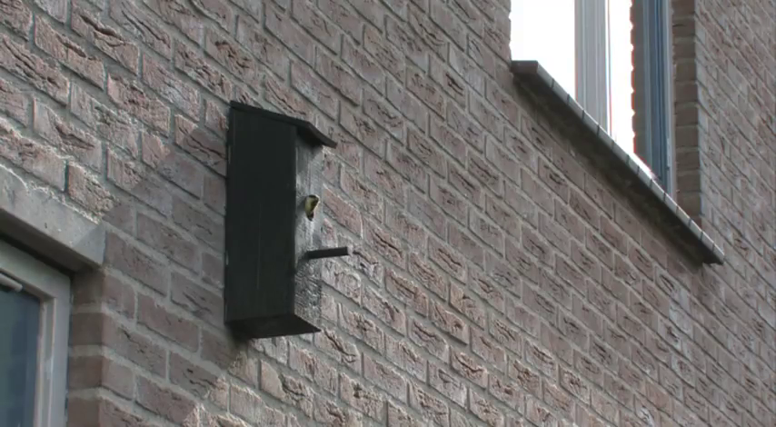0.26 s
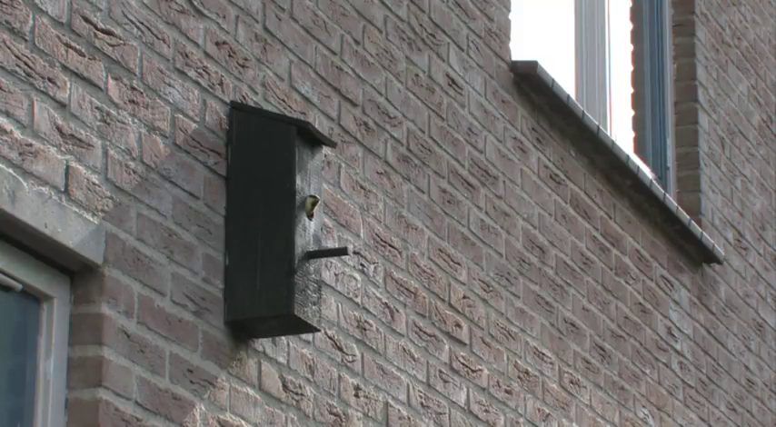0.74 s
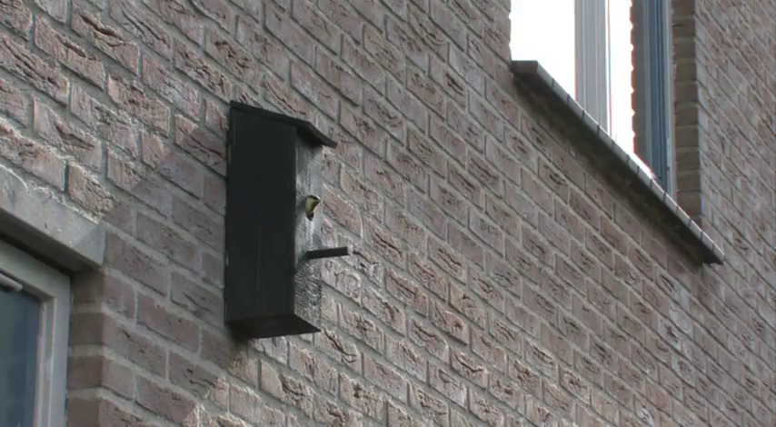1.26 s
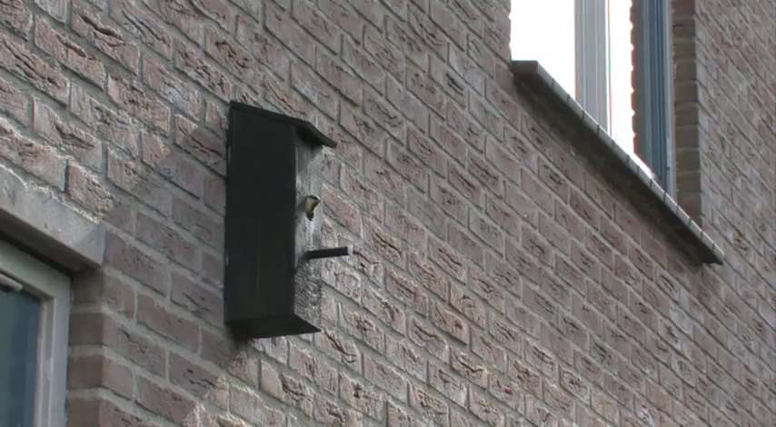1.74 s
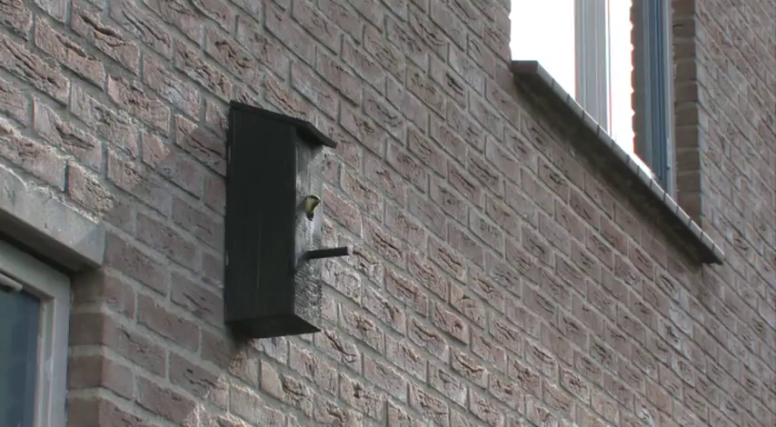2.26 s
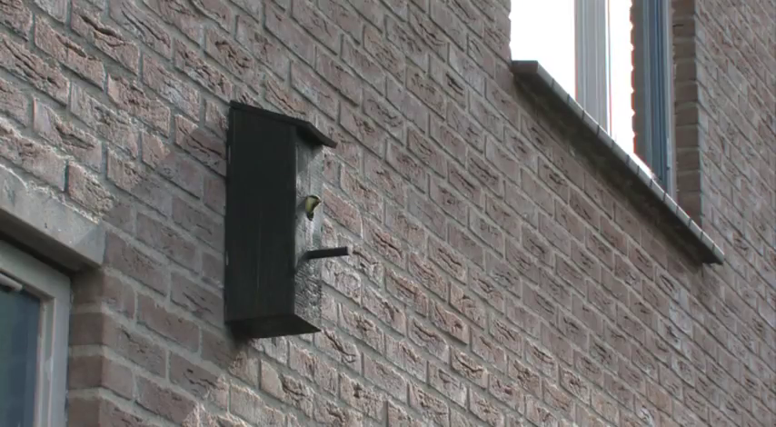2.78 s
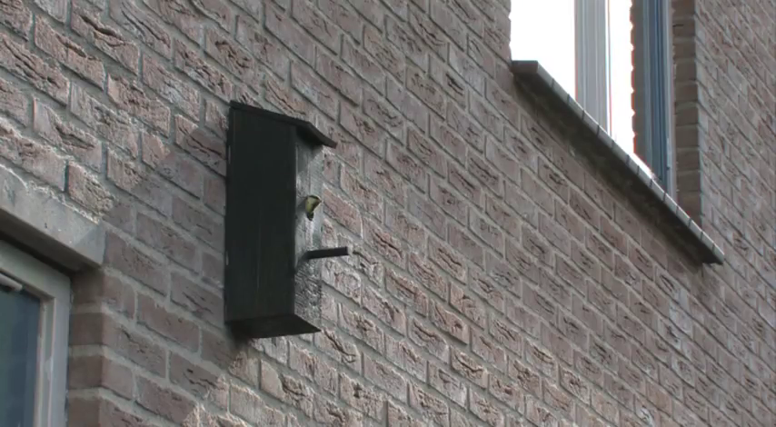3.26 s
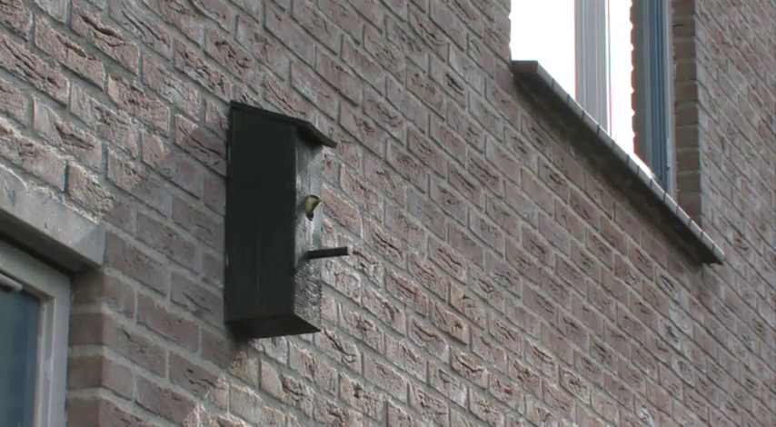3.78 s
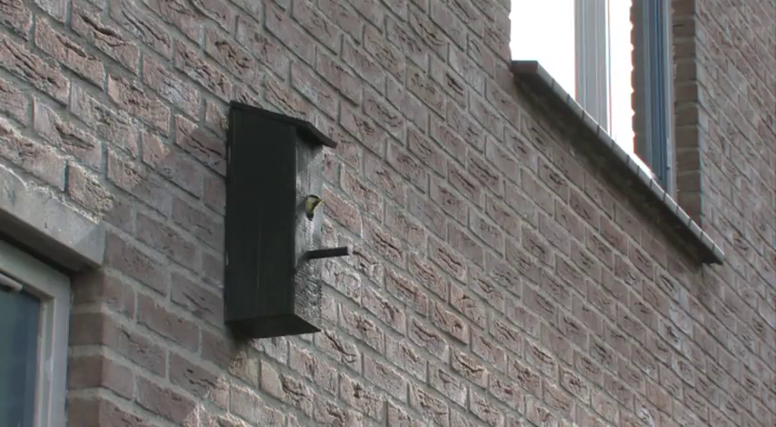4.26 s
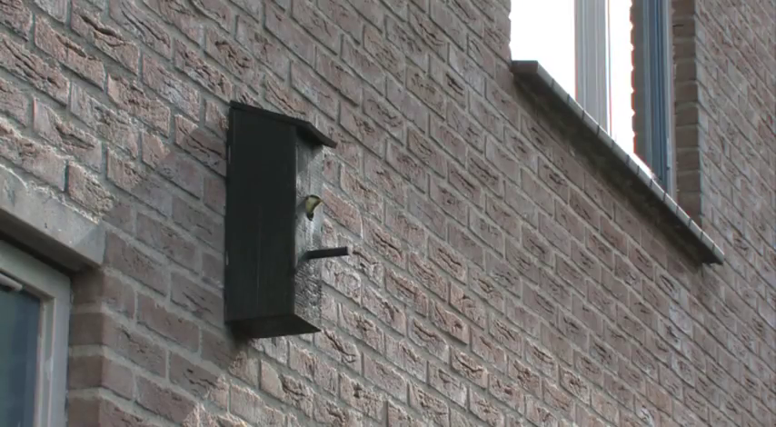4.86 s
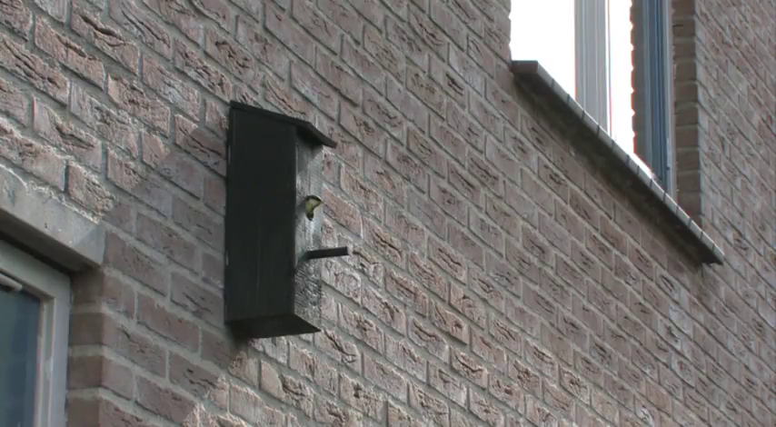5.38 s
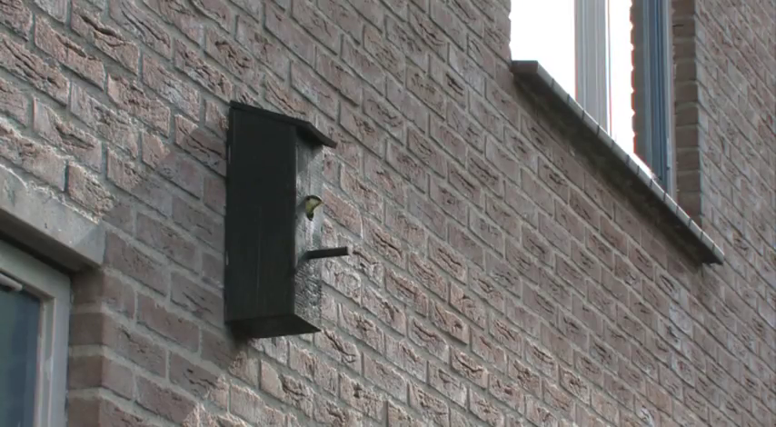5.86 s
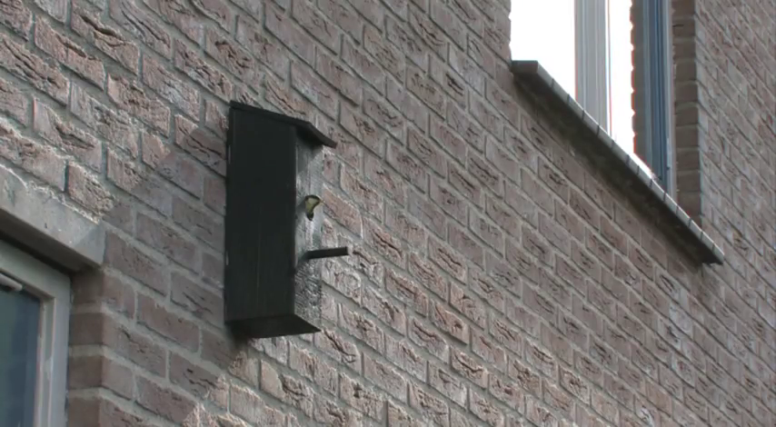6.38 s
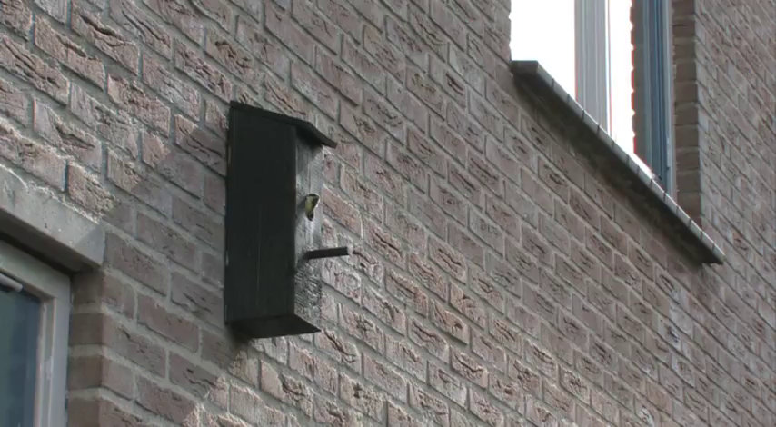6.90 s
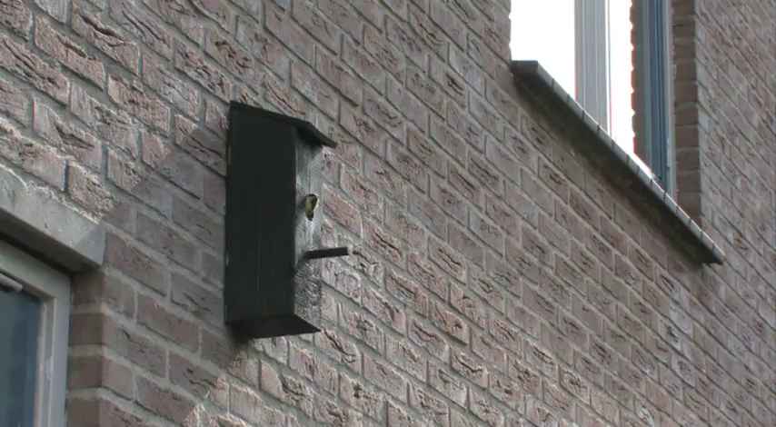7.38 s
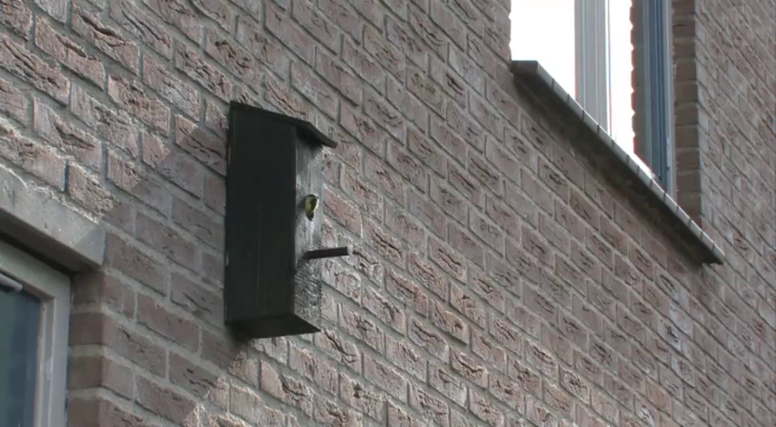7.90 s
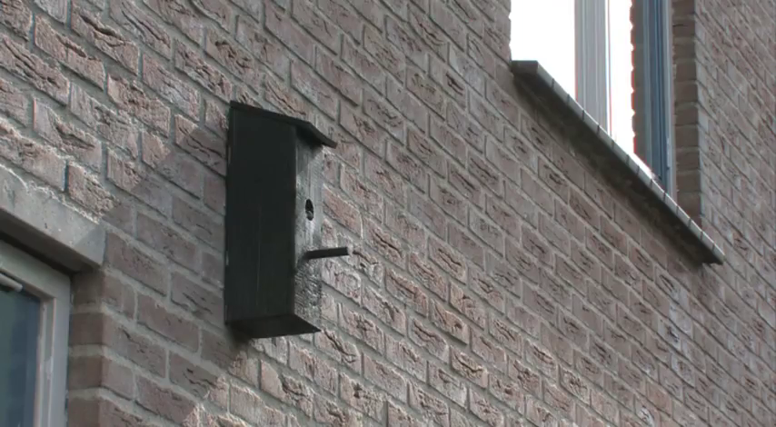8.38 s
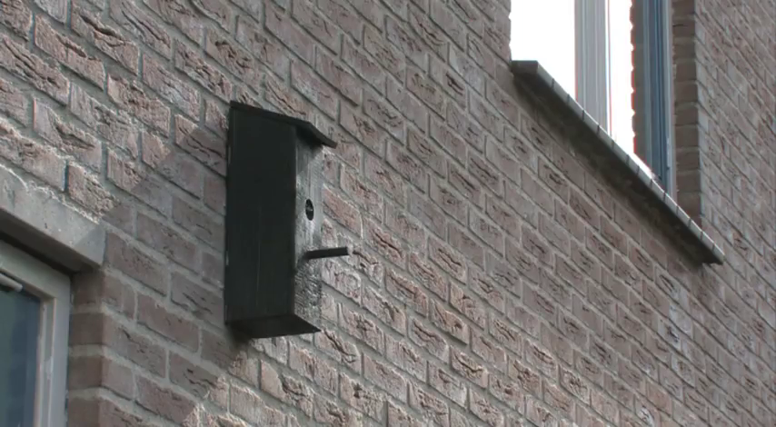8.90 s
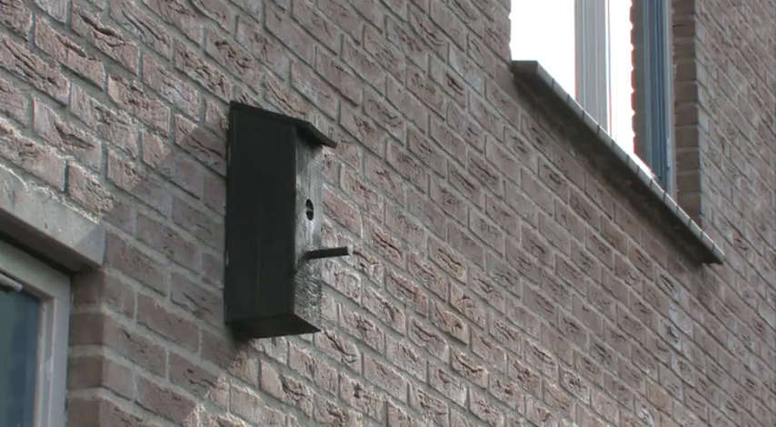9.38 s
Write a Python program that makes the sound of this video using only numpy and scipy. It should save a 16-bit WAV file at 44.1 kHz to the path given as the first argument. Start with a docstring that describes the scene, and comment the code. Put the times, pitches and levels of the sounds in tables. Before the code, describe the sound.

Faint garden birds slur and whistle over low hum and distant traffic; a nearby tit bursts into sharp buzzy chirps, later answering more softly.

```python
"""A yard by a brick house wall: distant traffic, hissing leaves and a camera's hum and whine run throughout.
First, birds in gardens further off give hoarse slurs and thin falling whistles as gliding, nearly pure tones.
Then a small tit at a nest box on the wall gives a loud burst of two-voiced chirps, and soft chirps follow:
both sides of its syrinx sing at once and mix, and the beak picks out partials near 6 kHz. Beyond, whistles
fall, rise and end in upsweeps; the tit closes with soft chirps again and a brighter burst among them."""
import sys
import numpy as np
from scipy import signal
from scipy.fft import rfft, irfft
from scipy.io import wavfile
from scipy.ndimage import uniform_filter1d

SR = 44100
rng = np.random.default_rng(int(sys.argv[2]) if len(sys.argv) > 2 else 0)


def transcribe(signal):
    """Save signal, clipped to [-1, 1], as a 16-bit WAV file at the path in sys.argv[1]."""
    frames = np.atleast_2d(signal).T
    limited = np.clip(frames, -1, 1)
    pcm = np.round(limited * 32767).astype(np.int16)
    wavfile.write(sys.argv[1], SR, pcm)


N = 425565
T = np.arange(N) / SR

# Tit at the nest box: loud burst, soft chirps, bright burst. Each row: start in seconds, length in seconds,
# held pitch of the lower voice in Hz, level in dB before the partial mix, beak and yard.
LOUD_CHIRPS = [(3.394, 0.081, 2670, -18.5), (3.492, 0.065, 2700, -16.5), (3.589, 0.07, 2634, -18),
               (3.725, 0.09, 2640, -18.5)]
SOFT_CHIRPS = [ (4.126, 0.094, 3130, -41), (4.256, 0.097, 3160, -42.5), (4.385, 0.087, 3130, -43),
               (4.520, .095, 3086, -41.5), (4.685, 0.092, 3110, -43), (5.290, .13, 3060, -62),
               (5.470, 0.1, 3080, -59), (5.640, .065, 3040, -58), (7.780, .11, 3140, -56),
               (7.890, 0.096, 3130, -56.5), (8.010, .1, 3140, -55), (8.160, .085, 3140, -57),
               (9.575, 0.11, 3150, -50)]
BRIGHT_CHIRPS = [ (8.527, 0.078, 2874, -33), (8.639, 0.071, 2980, -30.5), (8.746, 0.074, 2980, -30),
                 (8.859, .071, 2920, -30), (8.978, .071, 2940, -29.5), (9.109, 0.076, 2890, -30)]
# Partials of the coupled voices. Each row: multiple of the lower voice, multiple of the upper voice.
PARTIALS = [(1, 0), (0, 1), (2, 0), (1, 1), (0, 2), (3, -1), (-1, 3), (3, 0), (2, 1), (1, 2), (0, 3),
            (4, 0), (2, 2)]
# Base gain of each of those partials, in the same order. Each entry: gain in dB.
PARTIAL_DB = [-1.5, 1.5, -3, -3, -5, -17, -31, -16, -18, -27, -24, -33, -30]
# Shape of a chirp: time of the crest, time of the settled pitch, length of the final fall
RISE_S, SETTLE_S, FALL_S = .017, .032, .012
# The first chirp of a run leaps less, keeps a higher late pitch and has its voices wider apart.
# These are shares of the held pitch, and wear off with a time constant of WARM_UP_S.
FIRST_LEAP, FIRST_SAG, FIRST_SPREAD, WARM_UP_S = .125, 0.0717, .04, 0.083

# Hoarse low slurs of a far bird. Each row: start in seconds, pitch in Hz, level in dB before the swell,
# rasp as a share of the pitch.
FAR_SLURS = [(1.01, 2430, -54, .06), (1.15, 2217, -51.5, .018), (1.40, 1980, -56, 0.038),
             (1.585, 2306, -49, 0.064), (1.72, 2035, -50, .013), (4.75, 2030, -55, .035)]
# Thin falling whistles. Each row: start in seconds, pitch in Hz, level in dB before the swell,
# fall as a share of the pitch.
FAR_FALLS = [ (1.905, 6850, -48, .04), (2.08, 6740, -43.5, .045), (2.263, 6750, -47, 0.035),
             (5.455, 5240, -50.5, 0.08), (5.783, 4135, -42, .03), (6.288, 4316, -48, 0.063),
             (6.702, 4440, -47, .085)]
# Gently rising whistles. Each row: start in seconds, pitch in Hz, level in dB before the swell.
FAR_RISES = [(6.04, 3660, -45.5), (6.074, 4000, -45), (6.505, 3600, -44.5), (6.912, 3620, -43.5)]
# Quick upsweeps that end the song. Each row: start in seconds, pitch in Hz, level in dB before the swell.
FAR_UPSWEEPS = [(7.025, 3850, -47), (7.187, 3860, -43.5), (7.376, 3865, -42.5), (7.574, 3820, -44)]

# Far traffic. Each row: time in seconds, level in dB before the overall trim and flicker.
TRAFFIC_LEVEL = [(0.0, -47), (3.03, -47), (3.79, -48), (7.01, -50), (9.65, -47)]
# Hiss of the leaves. Each row: time in seconds, level in dB before the overall trim and flicker.
LEAF_LEVEL = [(0, -52), (.9, -50.5), (1.6, -53), (2.8, -52.5), (4, -55), (6.5, -58), (8.4, -55),
              (9.65, -55.5)]
# Colour of the outdoor air. Each row: frequency in Hz, relative spectral density in dB.
AIR_COLOUR = [(20, -22), (42, -17), (85, -2.5), (200, -0.5), (450, -1), (1000, -4.5), (1900, -11.5),
              (3500, -14.5), (7000, -18), (9000, -24), (12000, -32.5), (15500, -37)]
# Hum of the camera motor. Each row: mean frequency in Hz, rms level in dB before the throb.
MOTOR_HUM = [(62.9, -62.5), (126.0, -55.5), (150.0, -47)]
# Whine of the camera electronics. Each row: frequency in Hz, rms level in dB.
ELECTRONIC_WHINE = [(11723, -79), (15623, -66)]


def burst(rows, leap, sag, ratio, **voice):
    """One run of the tit's chirps with shared voice and beak settings; the opening one is shaped differently."""
    out = np.zeros(N)
    first_start = rows[0][0]
    for start, length, held_hz, db in rows:
        fresh = np.exp((first_start - start) / WARM_UP_S)
        crest_hz = held_hz * (1 + leap - FIRST_LEAP * fresh)
        late_hz = held_hz * (1 - sag + FIRST_SAG * fresh)
        voice_ratio = ratio + FIRST_SPREAD * fresh
        add(out, start, chirp(length, crest_hz, held_hz, late_hz, voice_ratio, db, **voice))
    return out


def chirp(length, crest_hz, held_hz, late_hz, ratio, db, upper_db, beak_hz, width_hz, opening, coupling_db,
          fundamental_db, rasp_db, hiss_db, onset_db, peak_share, onset_jitter, jitter):
    """Both voices leap to a crest, settle and fall away; their sums and overtones pass the beak resonance."""
    t = np.arange(int(length * SR)) / SR
    knots = np.sort([0, RISE_S / 3, RISE_S, SETTLE_S, length - FALL_S, length])
    knots_hz = [.75 * held_hz, .8 * held_hz, crest_hz, held_hz, late_hz, 0.78 * late_hz]
    pitch = np.interp(t, knots, knots_hz)
    pitch = uniform_filter1d(pitch, size=240, mode="nearest")  # rounds the corners

    # each voice is unsteady on its own, most of all before it has settled
    unrest = np.interp(t, [0, SETTLE_S], [onset_jitter, jitter])
    lower = pitch * (1 + unrest * walk(1476, len(t)))
    upper = pitch * ratio * (1 + unrest * walk(1585, len(t)))

    # the air pressure builds through the chirp; the upper voice starts weak and joins in late
    stages = np.sort([0, RISE_S, length * peak_share, length - 1.5 * FALL_S, length])
    pressure_db = np.interp(t, stages, [onset_db - 12, onset_db, 0, -.5, -17])
    pressure = undb(db + pressure_db)
    joining_db = upper_db + np.interp(t, [RISE_S, SETTLE_S], [-4, 0])

    # the beak opens as the chirp starts, which lifts its resonance
    centre_hz = beak_hz * np.interp(t, [RISE_S, SETTLE_S + FALL_S], [opening, 1])
    tone = 0
    for (m, n), partial_db in zip(PARTIALS, PARTIAL_DB):
        hz = m * lower + n * upper
        # mixed partials follow the coupling of the two sides; the throat muffles the fundamentals
        kind_db = coupling_db * (m * n != 0) + fundamental_db * (m + n == 1)
        gain = undb(partial_db + abs(n) * joining_db + kind_db)
        gain = gain * resonance(hz, centre_hz, width_hz)
        tone = tone + gain * np.sin(cycle(hz) + rng.uniform(0, 2 * np.pi))

    # turbulence in the air stream roughens the tone and hisses through the beak
    rough_tone = tone * (1 + undb(rasp_db) * walk(2500, len(t)))
    breath = undb(hiss_db) * hiss(len(t), centre_hz=6060, width_hz=1500)
    return (rough_tone + breath) * pressure * signal.windows.tukey(len(t), .08)


def far_birds():
    """Birds in gardens further off; all notes of one kind share a length and arch, and most a glide and rasp."""
    out = np.zeros(N)
    for start, hz, db, rasp in FAR_SLURS:
        add(out, start, whistle(hz, db, length=.13, glide=-0.095, arch=-.005, rasp=rasp))
    for start, hz, db, fall in FAR_FALLS:
        add(out, start, whistle(hz, db, length=0.116, glide=-fall, arch=-.008, rasp=0.011))
    for start, hz, db in FAR_RISES:
        add(out, start, whistle(hz, db, length=0.106, glide=0.078, arch=0.02, rasp=0.0061))
    for start, hz, db in FAR_UPSWEEPS:
        add(out, start, whistle(hz, db, length=0.1, glide=.32, arch=.05, rasp=0.013))
    return out


def whistle(hz, db, length, glide, arch, rasp, swell_db=3):
    """A nearly pure note: glide, arch and rasp are shares of its pitch, and it swells towards its end."""
    u = np.linspace(-.5, .5, int(length * SR))
    contour = hz * (1 + glide * u - arch * (2 * u) ** 2)
    pitch = contour * (1 + rasp * walk(710, len(u)))
    swell = undb(db + swell_db * (u - 1.5))  # 6 dB below the given level at the start, 3 dB at the end
    return swell * signal.windows.tukey(len(u), .4) * np.sin(cycle(pitch))


def yard(x, wall_db, tail_db, t60, wall_spread, house_lag=0.069, house_db=-3):
    """Quick reflections off the brickwork, then a thin tail with a soft echo from the houses opposite."""
    t = T[:SR]
    sparse = rng.random(SR) < .01
    wall = rng.standard_normal(SR) * sparse * np.exp(-t / wall_spread) * (t > .002)
    house_echo = 1 + undb(house_db) * np.exp(-((t - house_lag) / 0.019) ** 2)
    tail = rng.standard_normal(SR) * undb(-60 * t / t60) * house_echo * (t > .012)
    # wall and tail levels are relative to the direct sound
    response = undb(wall_db) * wall / np.linalg.norm(wall)
    response += undb(tail_db) * tail / np.linalg.norm(tail)
    return x + signal.fftconvolve(x, response)[:N]


def air(traffic_db=1.0, leaves_db=0.16, split_hz=1700, flicker_db=.5):
    """Noise split in two: far traffic below, a faint hiss of leaves above, each swelling by itself."""
    hz = np.fft.rfftfreq(N, 1 / SR) + 1
    points_hz, points_db = np.transpose(AIR_COLOUR)
    colour = undb(np.interp(np.log(hz), np.log(points_hz), points_db))
    low_share = 1 / (1 + (hz / split_hz) ** 4)  # share of the power
    traffic = irfft(rfft(rng.standard_normal(N)) * colour * np.sqrt(low_share), N)
    leaves = irfft(rfft(rng.standard_normal(N)) * colour * np.sqrt(1 - low_share), N)
    traffic_gain = undb(curve(TRAFFIC_LEVEL) + traffic_db + flicker_db * walk(5.4, N))
    leaves_gain = undb(curve(LEAF_LEVEL) + leaves_db + flicker_db * walk(7, N))
    return traffic / traffic.std() * traffic_gain + leaves / leaves.std() * leaves_gain


def camera(waver=.0015, throb_db=1.13, hiss_db=-74):
    """The motor hums with a slight waver and throb; the electronics add a thin steady whine and an even hiss."""
    hum, whine = 0, 0
    for hz, db in MOTOR_HUM:
        gain = undb(db + throb_db * walk(5, N))
        hum = hum + gain * np.sin(cycle(hz * (1 + waver * walk(4.2, N))))
    for hz, db in ELECTRONIC_WHINE:
        whine = whine + undb(db) * np.sin(2 * np.pi * hz * T)
    # root two turns rms levels into sine peaks
    return np.sqrt(2) * (hum + whine) + undb(hiss_db) * rng.standard_normal(N)


def undb(db):
    """Decibels to gain."""
    return 10 ** (np.asarray(db) / 20)


def curve(rows):
    """Rows of time in seconds and value, joined by straight lines."""
    return np.interp(T, *np.transpose(rows))


def walk(rate, size):
    """Random wander of roughly unit spread, with a fresh value rate times a second and straight lines between."""
    at = np.arange(size) / SR * rate
    return 1.4 * np.interp(at, np.arange(size), rng.standard_normal(size))


def resonance(hz, centre_hz, width_hz):
    """Gain of one resonance at the given frequencies."""
    detuning = (hz / centre_hz - centre_hz / hz) * centre_hz / width_hz
    return 1 / np.hypot(1, detuning)


def cycle(hz):
    """Phase of an oscillator that follows a pitch curve."""
    return 2 * np.pi * np.cumsum(hz) / SR


def hiss(size, centre_hz, width_hz):
    """Noise of unit level in one band, its sides steepened by squaring the resonance."""
    hz = np.fft.rfftfreq(size, 1 / SR) + 1
    noise = irfft(rfft(rng.standard_normal(size)) * resonance(hz, centre_hz, width_hz) ** 2, size)
    return noise / noise.std()


def add(out, start, sound):
    """Lay a sound into a track at its start in seconds."""
    i = int(start * SR)
    out[i:i + len(sound)] += sound[:N - i]


def scene():
    """The softer the tit's call, the more of it arrives by way of the walls; both channels are alike."""
    loud = burst(LOUD_CHIRPS, leap=.2, sag=0.0303, ratio=1.248, upper_db=-5.5,
                 beak_hz=5870, width_hz=1190, opening=0.89, coupling_db=3.0, fundamental_db=-3.5,
                 hiss_db=-16.0, onset_db=-2.5, rasp_db=-22, peak_share=.52, onset_jitter=.007, jitter=.0045)
    soft = burst(SOFT_CHIRPS, leap=.36, sag=.012, ratio=1.24, upper_db=-1,
                 beak_hz=6560, width_hz=890, opening=0.82, coupling_db=-1.0, fundamental_db=-1.0,
                 hiss_db=-15.5, onset_db=-0.5, rasp_db=-14, peak_share=.62, onset_jitter=.035, jitter=.008)
    bright = burst(BRIGHT_CHIRPS, leap=.15, sag=0.0584, ratio=1.245, upper_db=1,
                   beak_hz=6700, width_hz=1120, opening=0.8, coupling_db=-6.5, fundamental_db=-5,
                   hiss_db=-16, onset_db=-3.5, rasp_db=-15, peak_share=.7, onset_jitter=.024, jitter=.009)
    birds = yard(loud, wall_db=-15, tail_db=-19, t60=.38, wall_spread=.02)
    birds += yard(soft, wall_db=-4, tail_db=-4.5, t60=0.26, wall_spread=0.027)
    birds += yard(bright, wall_db=-3, tail_db=-9.5, t60=0.26, wall_spread=0.0098)
    birds += yard(far_birds(), wall_db=-2.5, tail_db=-6.5, t60=0.45, wall_spread=0.018)
    return np.tile(birds + air() + camera(), (2, 1))


def record(dry):
    """The recorder cuts the top of the treble, steeply above 15.8 kHz."""
    treble_cut = signal.ellip(12, .1, 80, 15800, fs=SR, output="sos")
    return signal.sosfilt(treble_cut, dry)


dry = scene()
out = record(dry)
transcribe(out)
```